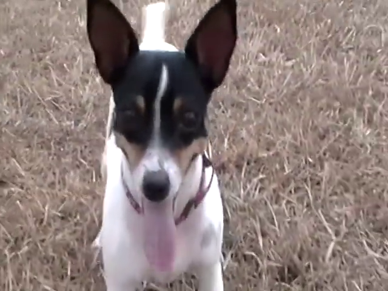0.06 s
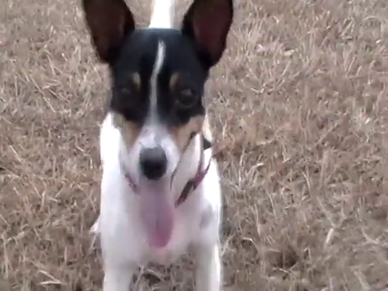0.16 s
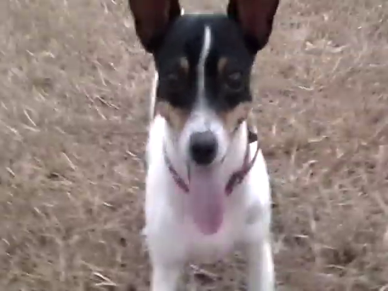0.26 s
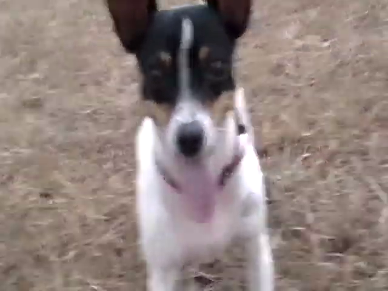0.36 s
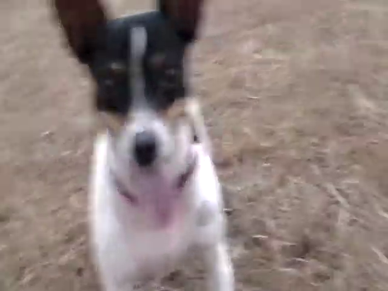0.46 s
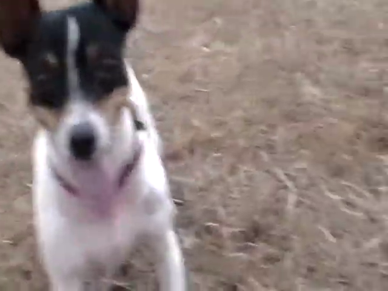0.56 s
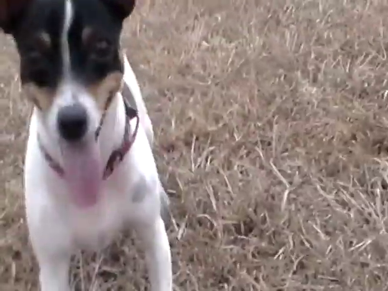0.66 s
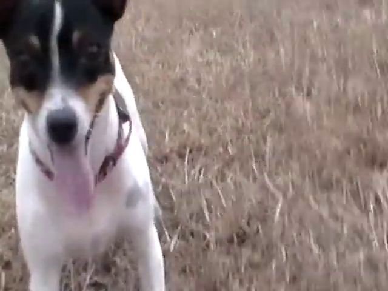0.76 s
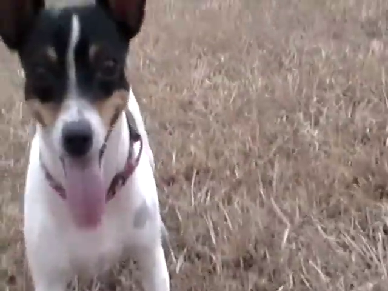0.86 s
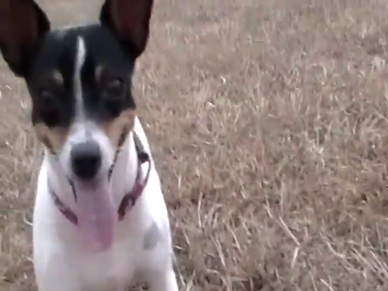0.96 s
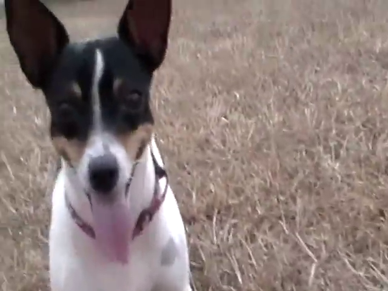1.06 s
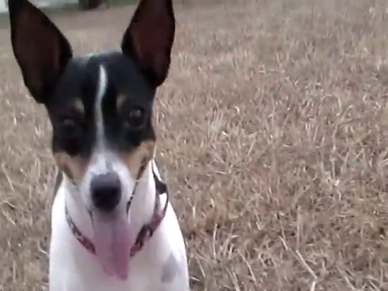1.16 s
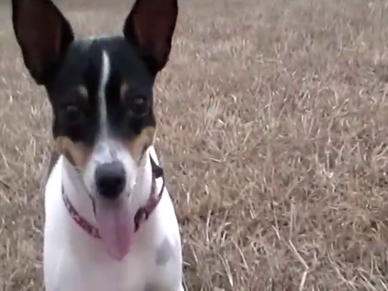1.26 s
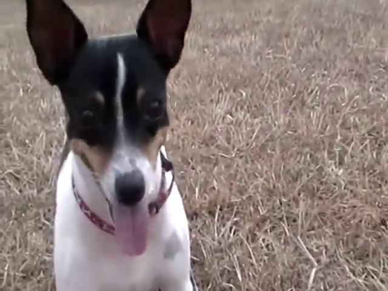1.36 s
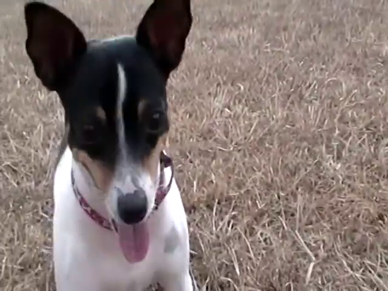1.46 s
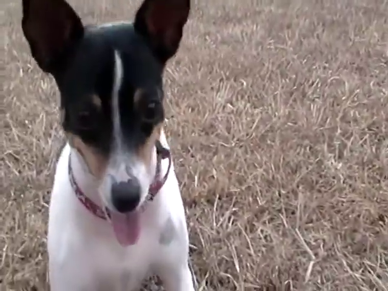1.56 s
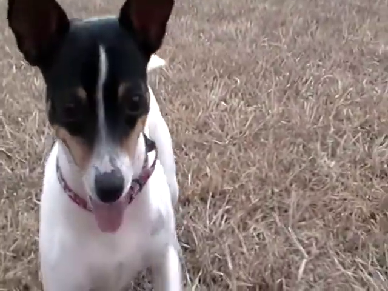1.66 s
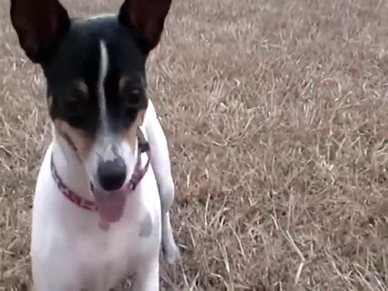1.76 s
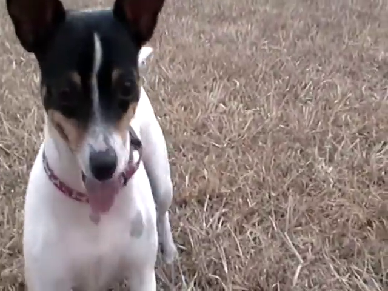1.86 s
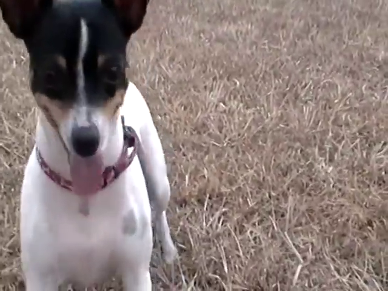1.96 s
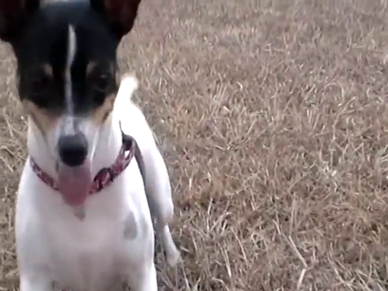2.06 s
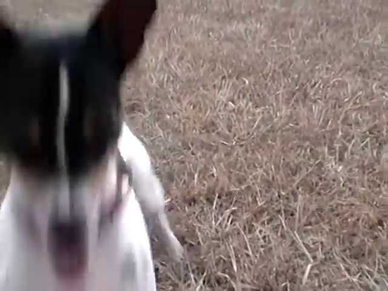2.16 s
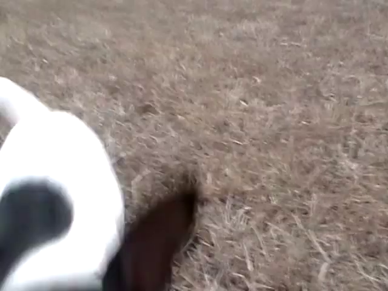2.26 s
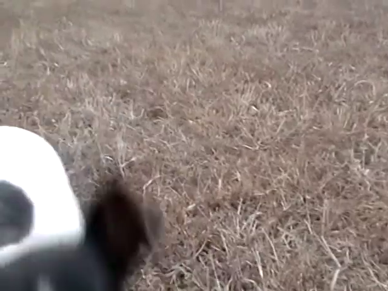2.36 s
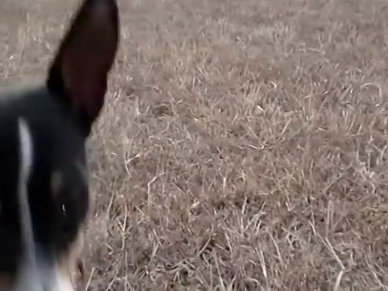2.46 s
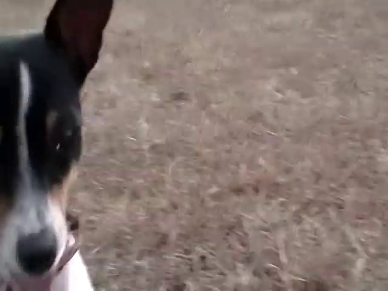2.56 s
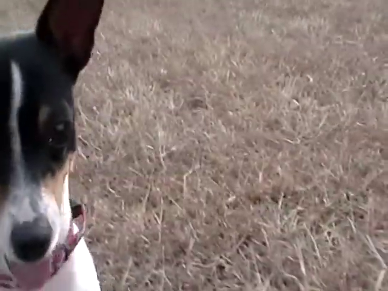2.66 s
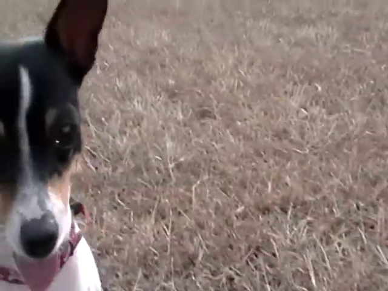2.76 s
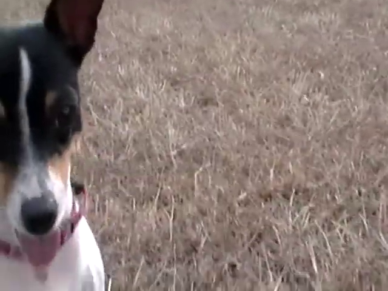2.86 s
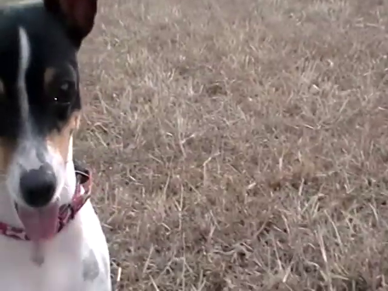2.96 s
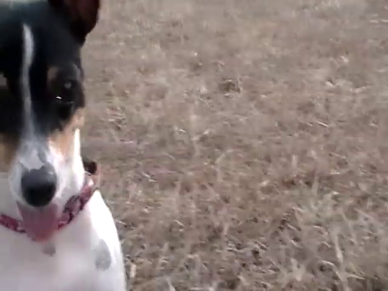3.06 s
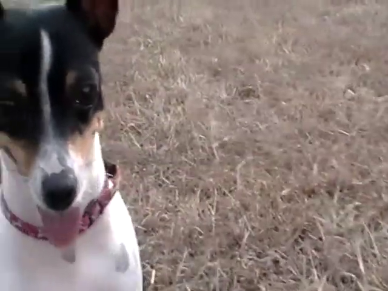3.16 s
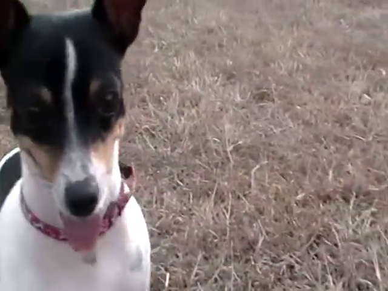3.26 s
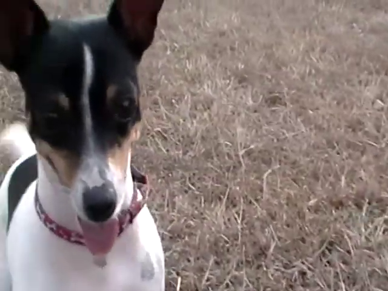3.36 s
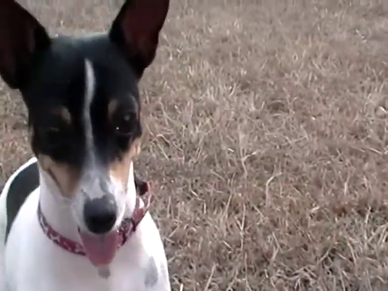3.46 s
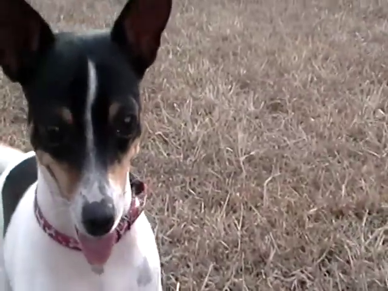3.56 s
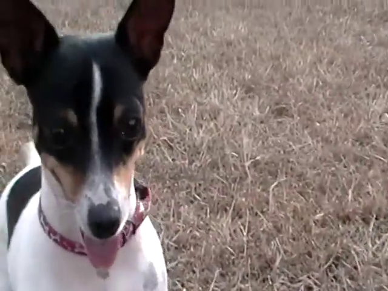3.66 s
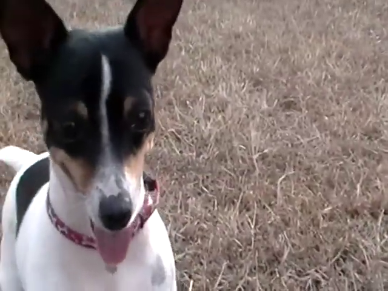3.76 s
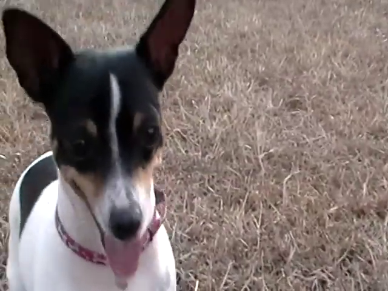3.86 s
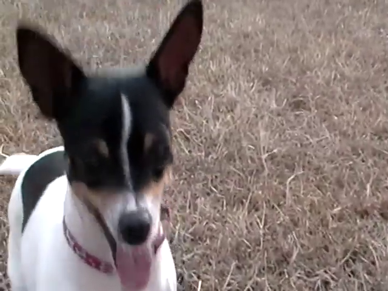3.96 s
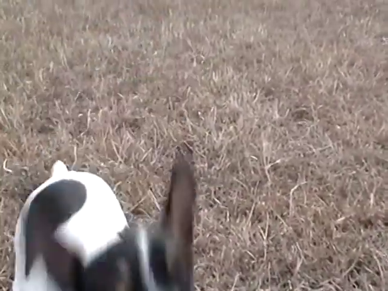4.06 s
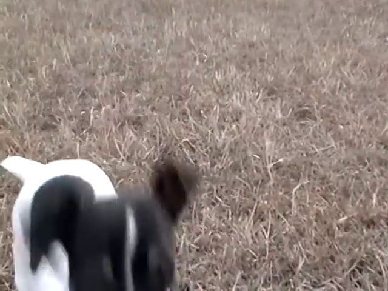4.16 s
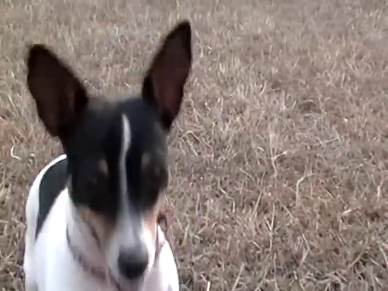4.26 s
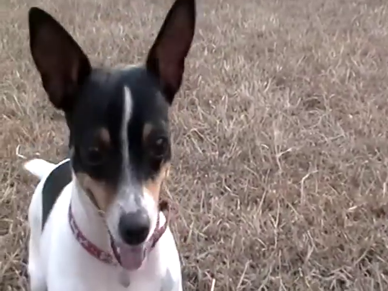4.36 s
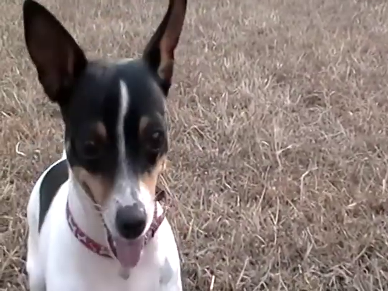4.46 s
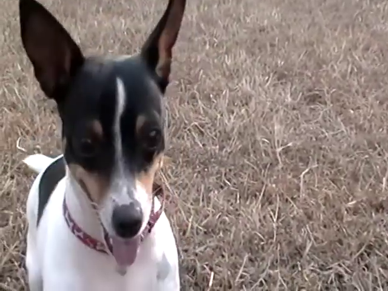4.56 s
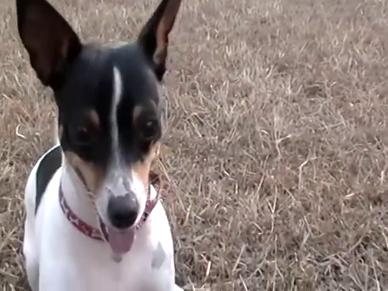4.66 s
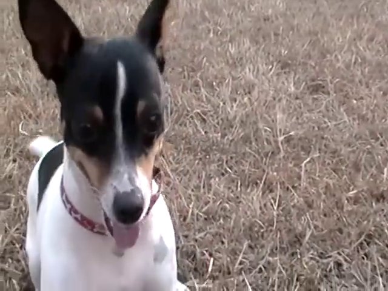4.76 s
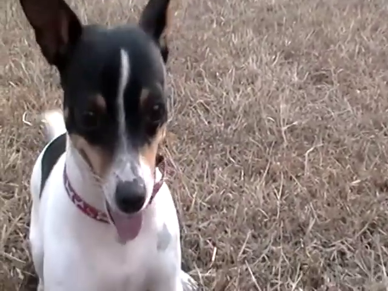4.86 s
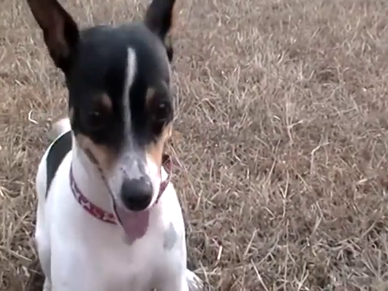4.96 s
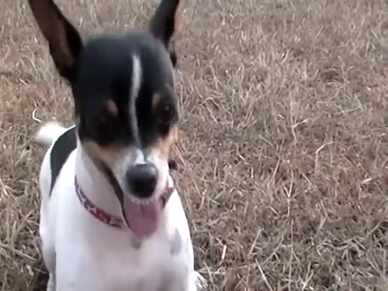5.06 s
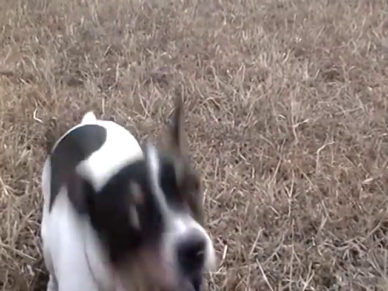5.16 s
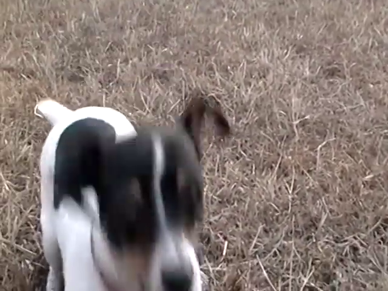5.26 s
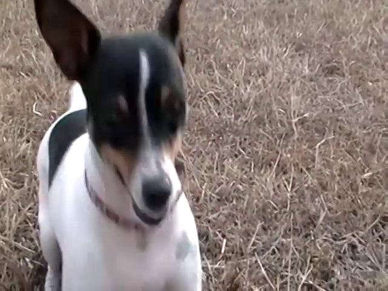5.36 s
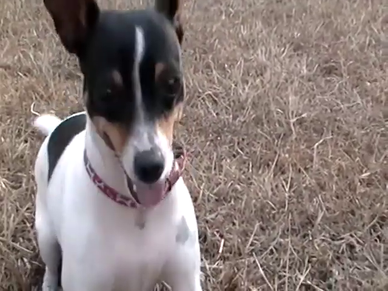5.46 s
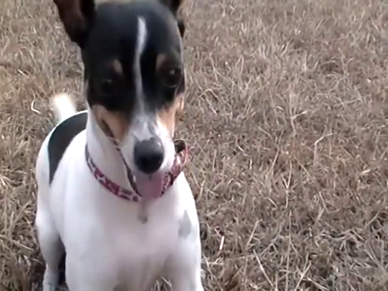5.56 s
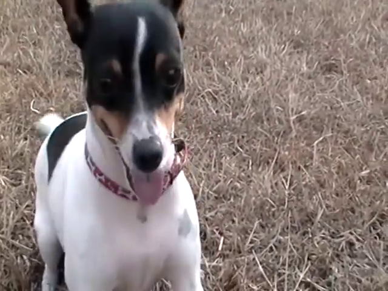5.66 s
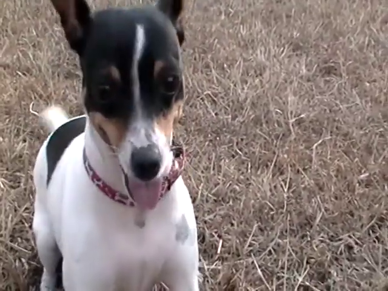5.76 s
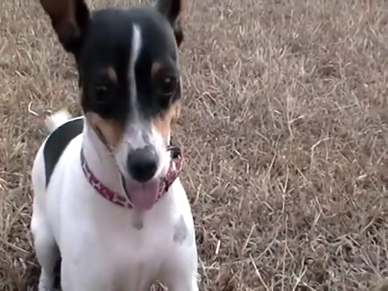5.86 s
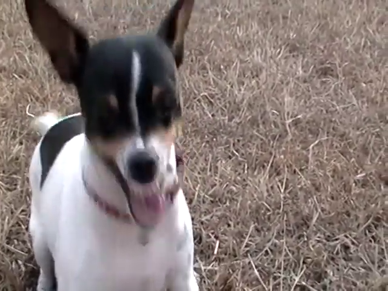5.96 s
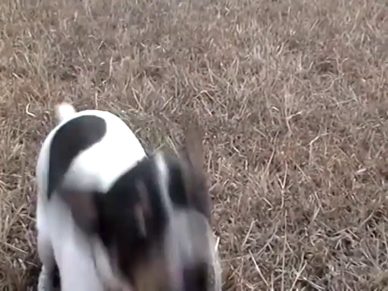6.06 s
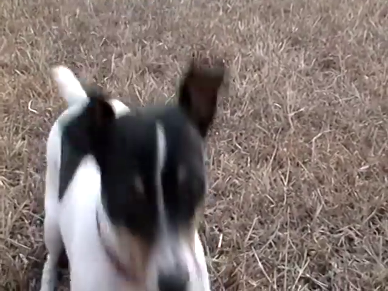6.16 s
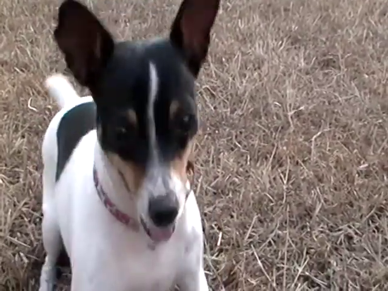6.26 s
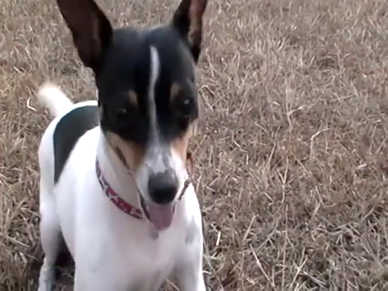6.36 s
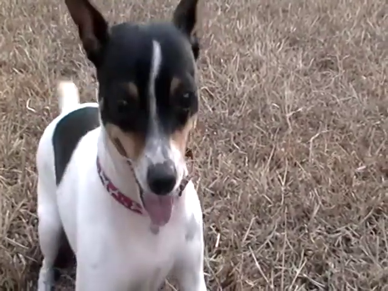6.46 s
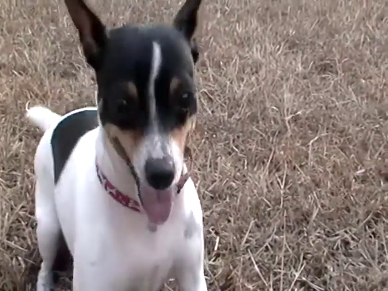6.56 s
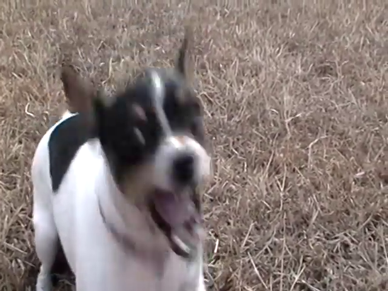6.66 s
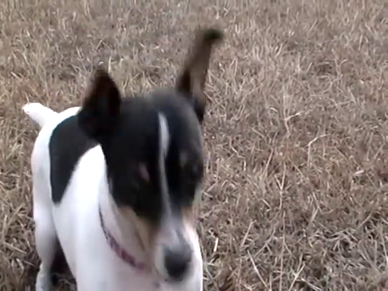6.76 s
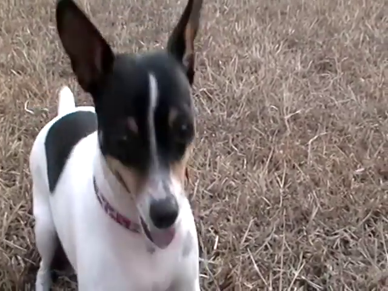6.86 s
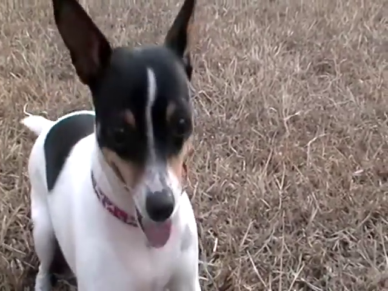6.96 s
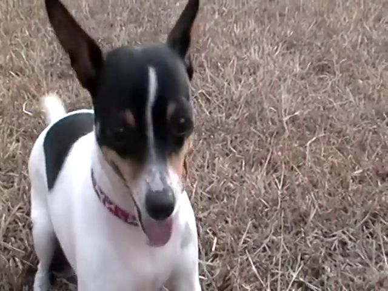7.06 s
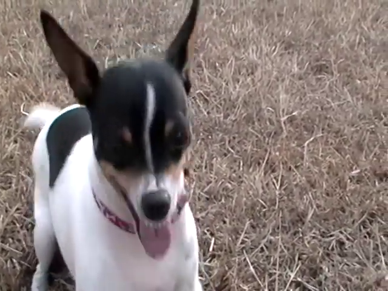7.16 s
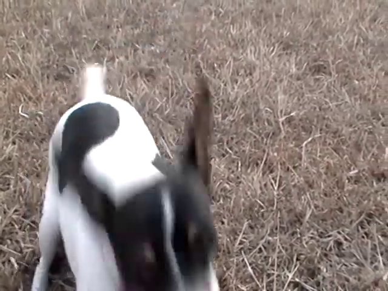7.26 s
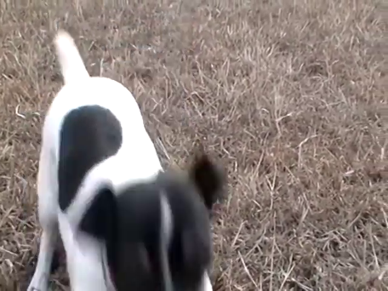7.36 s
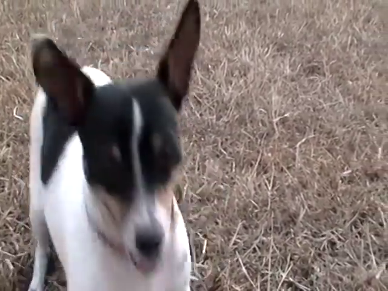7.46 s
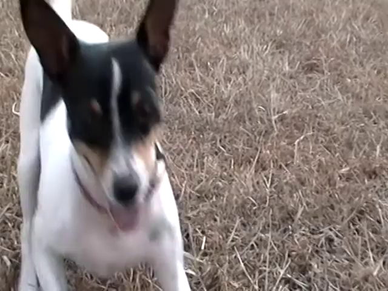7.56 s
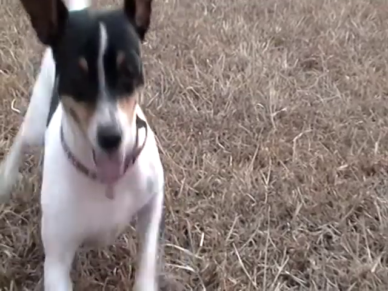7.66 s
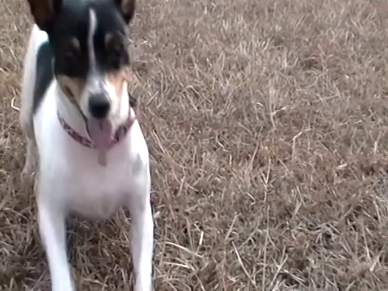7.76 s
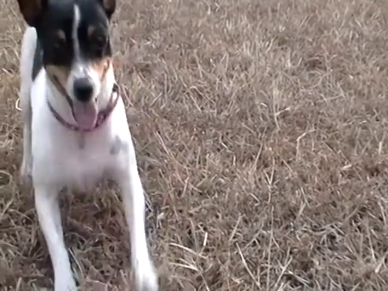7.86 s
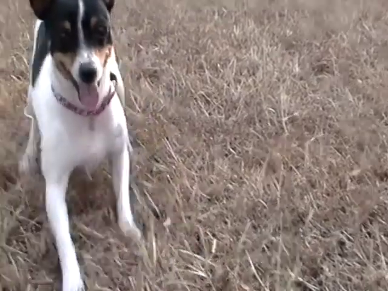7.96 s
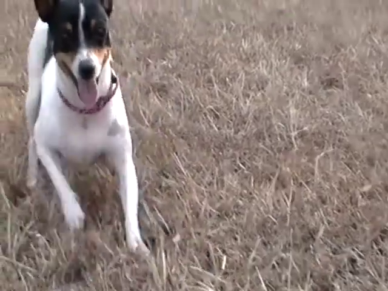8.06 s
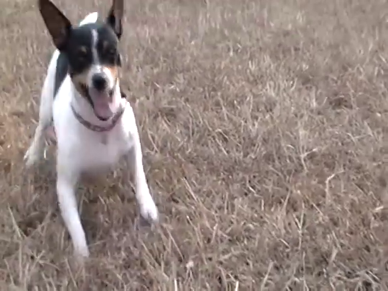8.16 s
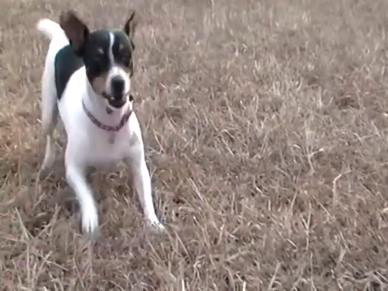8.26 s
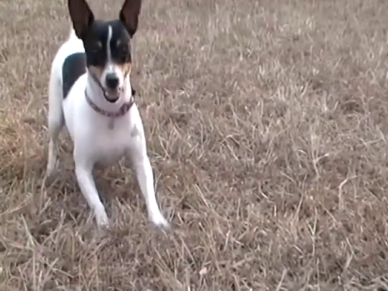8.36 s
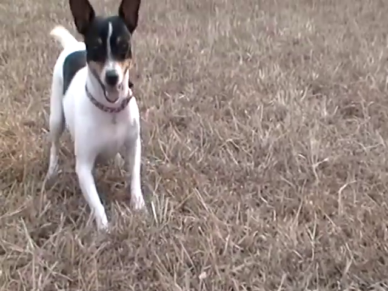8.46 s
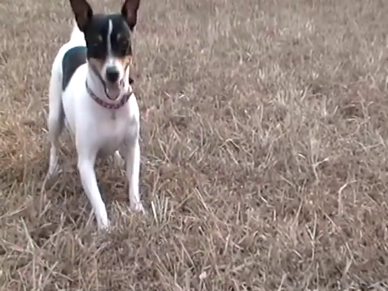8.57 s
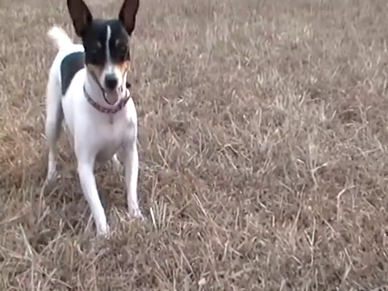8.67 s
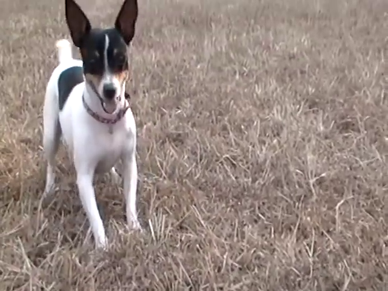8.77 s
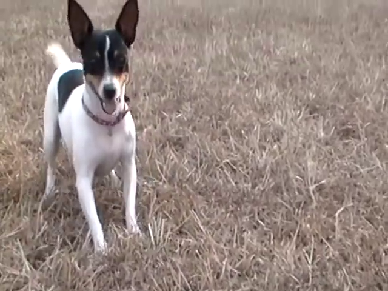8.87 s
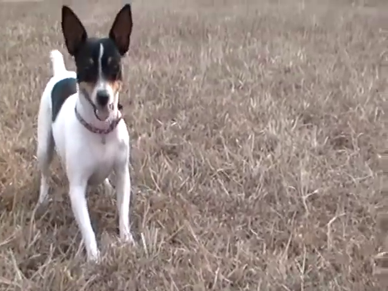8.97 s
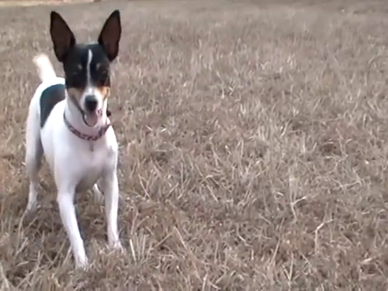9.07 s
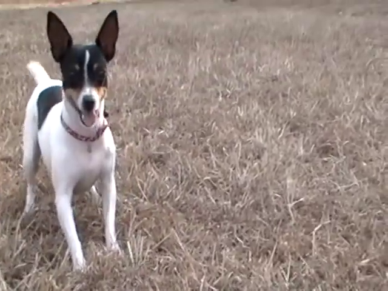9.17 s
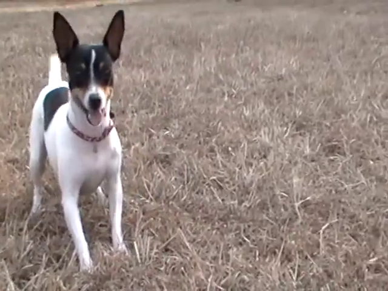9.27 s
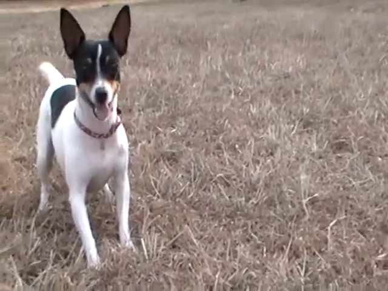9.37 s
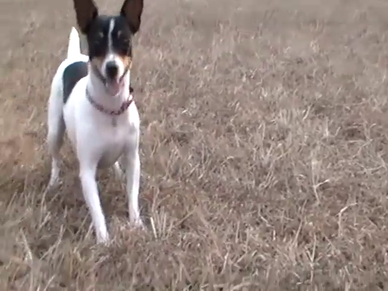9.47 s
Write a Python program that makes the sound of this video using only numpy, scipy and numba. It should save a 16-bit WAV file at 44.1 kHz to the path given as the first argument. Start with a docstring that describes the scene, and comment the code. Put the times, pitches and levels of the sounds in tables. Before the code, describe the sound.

A small dog pants lightly and shifts in crackling dry grass, then barks seven times between about two and eight seconds. Each bark starts with a tiny grunt and bursts into a piercing, rough yelp that clips the close microphone and echoes briefly around the yard. The dog backs off before the last, weaker bark, led by a thin whine and growl. Faint bird whistles and far rumble remain.

```python
"""A small terrier barks seven times, shrill and raspy, on a dry lawn close by, and pants in between.
Each bark is a gliding tone that breaks into chaos and overloads the input; fences and walls throw it back.
A thin whine leads into the last bark, and low grunts and breath thuds go with the barks.
Dry grass rustles as shaped noise, a small bird whistles faintly in gliding tones,
the neighbourhood rumbles far off as coloured noise, and a lens motor whirrs faintly at first."""
import sys
import numpy as np
from scipy import signal
from scipy.fft import rfft, irfft
from scipy.io import wavfile
from scipy.ndimage import map_coordinates
from numba import njit

SR = 44100
rng = np.random.default_rng(int(sys.argv[2]) if len(sys.argv) > 2 else 0)


def transcribe(signal):
    """Save signal, clipped to [-1, 1], as a 16-bit WAV file at the path in sys.argv[1]."""
    frames = np.atleast_2d(signal).T
    limited = np.clip(frames, -1, 1)
    pcm = np.round(limited * 32767).astype(np.int16)
    wavfile.write(sys.argv[1], SR, pcm)


N = 418950  # samples
TIME = np.arange(N) / SR  # s


def undb(db):
    """Logarithmic level: decibels become an amplitude gain."""
    return 10 ** (np.asarray(db) / 20)


def unit(x):
    """Normalisation: scale to rms 1."""
    return x / np.sqrt(np.mean(x ** 2) + 1e-18)


def add(track, s, x):
    """Superposition: mix x into the track from s seconds on."""
    i = max(int(s * SR), 0)
    track[i:i + len(x)] += x[:max(N - i, 0)]


def colour(x, points):
    """Linear filtering: weight the spectrum by (Hz, dB) points, joined on a logarithmic frequency axis."""
    hz, db = np.transpose(points)
    f = np.fft.rfftfreq(x.shape[-1], 1 / SR)
    gain = undb(np.interp(np.log(f + 1), np.log(hz), db))
    return irfft(rfft(x) * gain, x.shape[-1])


def air(size, modes):
    """Turbulence exciting resonances: noise through steep (Hz, width Hz, dB) peaks, rms 1."""
    f = np.fft.rfftfreq(size, 1 / SR) + 1
    gain = sum(undb(db) / (1 + ((f * f - hz * hz) / (f * width)) ** 2) for hz, width, db in modes)
    return unit(irfft(rfft(rng.standard_normal(size)) * gain, size))


def walk(size, rate_hz):
    """Slow random modulation: a smooth curve through random knots of spread 1."""
    knots = rng.standard_normal(int(size * rate_hz / SR) + 4)
    return map_coordinates(knots, [np.arange(size) * rate_hz / SR], order=2, mode="nearest")


def swell(size, edge):
    """Amplitude envelope: a flat top whose round edges take up the given share."""
    return signal.windows.tukey(size, min(edge, 1))


def glides(rows, overtone_db, waver):
    """Frequency modulation: short gliding tones whose overtones change by a fixed step in level."""
    out = np.zeros(N)
    for s, length, first_hz, last_hz, db in rows:
        size = int(length * SR)
        hz = np.geomspace(first_hz, last_hz, size) * (1 + waver * walk(size, 85))
        phase = 2 * np.pi * np.cumsum(hz) / SR
        audible = [k for k in range(4) if (k + 1) * last_hz < SR / 2]
        tone = sum(undb(overtone_db * k) * np.sin((k + 1) * phase) for k in audible)
        add(out, s, undb(db) * unit(tone) * swell(size, .8))
    return out


# Spectrum of the distant rumble. Each row: frequency in Hz, relative spectral level in dB.
TOWN_SPECTRUM = [(15, -46), (25, -30), (53, -5), (137, -1.5), (325, -15.5), (353, -11.5), (382, -15.5),
                 (793, -18), (1130, -19.5), (1440, -28), (1990, -30.5), (6010, -38.5), (8080, -45),
                 (8770, -46), (15900, -64)]
# Stereo width of the rumble. Each row: frequency in Hz, side level minus middle level in dB.
TOWN_SIDE = [(40, -11), (110, -12.5), (200, -11), (400, -6), (1300, -2.5), (4400, 2), (8000, -7.5)]


def town():
    """Incoherent sources add to noise: far traffic and light wind, gently swelling, wide and a little left."""
    mid = unit(colour(rng.standard_normal(N), TOWN_SPECTRUM))
    side = colour(unit(colour(rng.standard_normal(N), TOWN_SPECTRUM)), TOWN_SIDE)
    left_db = 0.46
    stereo = np.array([undb(left_db) * mid + side, undb(-left_db) * mid - side])
    level_db = -49.5 + 1.0 * walk(N, 2.7) + 0.46 * walk(N, 11)
    return stereo * undb(level_db)


# Whirr of the lens motor. Each row: resonance in Hz, width in Hz, relative level in dB.
LENS_MODES = [(1880, 1300, 9.5), (3670, 900, 4.5), (5230, 360, 8), (7400, 380, -6), (9100, 640, -13)]


def lens(stop_s, db):
    """Resonant radiation: the motor's whirr is noise through resonances; it runs at first, then stops."""
    running = np.clip((stop_s - TIME) / 0.014, 0, 1)
    return undb(db) * air(N, LENS_MODES) * running


# The bird's thin whistles. Each row: start in seconds, length in seconds, first pitch in Hz,
# last pitch in Hz, level in dB.
BIRD_WHISTLES = [(.55, 0.11, 7150, 7700, -64), (3.05, 0.057, 7100, 7400, -55), (3.34, .09, 7270, 7400, -69),
                 (3.68, 0.11, 8260, 8160, -71), (8.72, 0.052, 7360, 7470, -64),
                 (8.84, 0.23, 8200, 8200, -72), (9.0, 0.13, 6520, 6400, -68.5),
                 (9.045, 0.027, 5400, 4150, -63), (9.46, 0.088, 7120, 7940, -59)]


def bird():
    """A nearly sinusoidal source: gliding whistles with very weak overtones."""
    return glides(BIRD_WHISTLES, overtone_db=-34, waver=.01)


# Echoes off fences and walls. Each row: delay in seconds, level in dB before the yard's colouring.
WALL_ECHOES = [(0.0609, -29), (0.0815, -26.5), (0.0853, -33), (.1145, -36.5), (.180, -38)]
# Spectrum of what the yard sends back. Each row: frequency in Hz, gain in dB.
YARD_SPECTRUM = [(300, -22.5), (800, -14.5), (1300, -10.5), (1800, -3.5), (2400, -2), (3200, 0.5),
                 (3900, -2.5), (4800, -2.5), (5800, -5), (12000, -23.5)]


def yard(voice):
    """Reflection and scattering: a few distinct echoes and a long tail from trees and houses, unlike at each ear."""
    t = TIME[:SR * 3 // 2]
    decay_s = 0.99  # time to fall by 60 dB
    scatter = rng.standard_normal((2, len(t))) * undb(5 * walk(len(t), 900) - 60 * t / decay_s)
    scatter *= np.clip((t - .045) / 0.013, 0, 1)
    # row 0 is the middle, row 1 the side
    response = undb(-28.0) * scatter / np.sqrt(np.sum(scatter ** 2) / 2)
    response[1] *= undb(-7.5)
    for delay, db in WALL_ECHOES:
        response[0, int(delay * SR)] += undb(db)
    returned = signal.fftconvolve(voice[None], response, axes=1)[:, :N]
    mid, side = colour(returned, YARD_SPECTRUM)
    return np.array([mid + side, mid - side])


# Spectrum of brushing dry blades. Each row: frequency in Hz, relative spectral level in dB.
GRASS_SPECTRUM = [(400, -22), (1000, -6.5), (2500, -6), (4500, -6.5), (7500, -3), (10000, -6),
                  (13000, -12.5), (16000, -16.5)]
# Faint stir of the grass between swishes. Each row: time in seconds, level in dB.
GRASS_STIR = [(0, -62), (.6, -61.5), (.85, -58.5), (1.12, -55.5), (1.2, -73), (1.5, -69), (1.7, -65.5),
              (3.2, -51), (3.75, -62), (4.55, -56.5), (4.85, -60.5), (6.5, -53.5), (6.95, -61.5),
              (8.5, -57), (8.8, -64.5), (9.5, -77)]
# Swishes as the dog shifts about. Each row: middle in seconds, length in seconds, peak level in dB.
GRASS_SWISHES = [(.06, 0.085, -51), (.24, 0.16, -51.5), (.39, 0.18, -43), (.785, 0.076, -49),
                 (1.665, 0.14, -49.5), (1.79, 0.12, -46.5), (1.97, 0.094, -47), (2.11, 0.21, -53),
                 (2.245, 0.17, -33), (2.45, 0.24, -40), (2.67, 0.23, -39), (2.78, 0.14, -41.5),
                 (2.96, 0.21, -41.5), (3.27, 0.27, -44.5), (3.86, 0.13, -44), (4.0, 0.29, -40.5),
                 (4.32, 0.32, -46), (4.97, 0.13, -55.5), (5.115, 0.17, -41.5), (5.396, 0.22, -45.5),
                 (5.5, 0.17, -51), (6.04, 0.4, -40), (6.35, 0.32, -48.5), (6.6, 0.16, -48),
                 (6.755, 0.14, -33), (7.06, 0.048, -52), (7.2, 0.28, -47), (7.615, 1, -39.5),
                 (7.9, 0.34, -40.5), (8.1, 0.74, -42.5), (8.254, 0.2, -30), (8.437, 0.2, -44.5),
                 (8.61, 0.13, -52)]
# Footfalls, swishes and snapping stalks. Each row: start in seconds, level in dB, centre in Hz,
# rise in seconds, decay constant in seconds.
FOOTFALLS = [(0.367, -26.5, 8500, 0.024, 0.018), (0.43, -39, 700, .002, 0.011),
             (0.647, -37.5, 886, 0.0013, 0.011), (0.756, -42, 880, 0.0018, 0.013),
             (.756, -51, 5950, .003, 0.059), (1.123, -44.5, 4500, 0.0059, 0.0092),
             (2.996, -30, 8100, 0.0011, 0.003), (8.89, -46, 994, 0.00096, 0.003)]


def grass():
    """Frictional noise: dry blades brush and crackle over a faint stir; a foot lands or a stalk snaps."""
    power = undb(np.interp(TIME, *np.transpose(GRASS_STIR)) + 2 * walk(N, 12)) ** 2
    for s, length, db in GRASS_SWISHES:
        swish = undb(db) * swell(int(length * SR), 0.92)
        add(power, s - length / 2, swish ** 2)
    crackle_db = 2 * walk(N, 900) + 1.4 * walk(N, 56)
    blades = rng.standard_normal(N) * undb(crackle_db)
    out = unit(colour(blades, GRASS_SPECTRUM)) * np.sqrt(power)
    t = TIME[:SR // 5]
    for s, db, hz, rise, decay in FOOTFALLS:
        envelope = np.minimum(t / rise, 1) ** 2 * np.exp(-np.maximum(t - rise, 0) / decay)
        add(out, s, undb(db) * air(len(t), [(hz, 0.95 * hz, 0)]) * envelope)
    return out


# The dog's pants. Each row: middle in seconds, length in seconds, level in dB,
# gain in dB of the resonances above 2000 Hz.
PANT_PUFFS = [(0.124, 0.052, -46.5, -9), (0.861, 0.088, -42.5, -6), (1.968, 0.091, -39.5, -2.5),
              (2.645, 0.095, -26.5, 0), (2.929, 0.11, -28.5, -3), (3.23, 0.087, -30, -2),
              (3.545, 0.13, -38, -2.5), (3.855, 0.12, -30.5, -4.5), (4.371, 0.094, -26, 1),
              (4.647, 0.11, -44, -3), (4.971, 0.1, -33.5, -2.5), (5.51, 0.11, -26.5, 1),
              (5.781, 0.062, -36, -1.5), (5.841, 0.11, -35, -1.5), (6.384, .10, -24, 5),
              (7.066, 0.097, -26.5, 5), (7.650, 0.097, -24, 8), (7.909, .11, -29.5, 7.5),
              (8.614, 0.085, -37.5, 10)]
# Resonances of the panting throat. Each row: frequency in Hz, width in Hz, relative level in dB.
THROAT_MODES = [(797, 120, 1), (1098, 170, 1), (1797, 420, -9), (2752, 810, 0), (4630, 900, -16),
                (6340, 2500, -17.5)]


def panting():
    """Turbulent flow: puffs of air over the tongue, each with its own brightness; saliva makes them flutter."""
    out = np.zeros(N)
    for s, length, db, treble_db in PANT_PUFFS:
        size = int(length * SR)
        modes = [(hz, width, mode_db + treble_db * (hz > 2000)) for hz, width, mode_db in THROAT_MODES]
        flutter_db = 1.5 * walk(size, 180)
        add(out, s - length / 2, undb(db + flutter_db) * air(size, modes) * swell(size, 0.79))
    return out


# Breath from a bark that strikes the microphone. Each row: start in seconds, length in seconds, level in dB.
BREATH_BLASTS = [(2.274, 0.11, -11), (4.055, 0.11, -16.5), (5.165, 0.12, -36), (6.043, 0.11, -32.5),
                 (6.693, .04, -21), (7.285, 0.029, -23.5)]


def blasts():
    """Uncorrelated pressure turbulence: each puff buffets the two ports with its own low noise."""
    out = np.zeros((2, N))
    for s, length, db in BREATH_BLASTS:
        size = int(length * SR)
        for port in out:
            add(port, s, undb(db) * air(size, [(128, 100, 0)]) * swell(size, 0.38))
    return out


# Low grunts that start the barks. Each row: start in seconds, length in seconds, first pitch in Hz,
# last pitch in Hz, level in dB.
BARK_GRUNTS = [(2.268, 0.017, 223.5, 356, -14.5), (4.046, 0.013, 219, 363, -15),
               (5.162, 0.018, 246, 398, -15.5), (6.041, 0.023, 271, 418, -14),
               (6.639, 0.013, 234, 400, -16.5), (7.276, 0.017, 252, 400, -14),
               (8.197, 0.036, 200, 371.5, -15.5), (8.226, 0.0224, 390, 392, -10.5)]


def grunts():
    """A harmonic source: short low tones that rise in pitch, with falling overtones."""
    return glides(BARK_GRUNTS, overtone_db=-8.0, waver=.09)


# Resonances of the half-closed throat. Each row: frequency in Hz, width in Hz, relative level in dB.
GROWL_THROAT = [(278.6, 160, 1.5), (1440, 200, -4), (3300, 760, 0)]


def growl(s, length, first_hz, last_hz, db):
    """Impulse excitation: slow slaps of the vocal folds, speeding up, ring the throat just before a bark."""
    size = int(length * SR)
    hz = np.geomspace(first_hz, last_hz, size) * np.exp(0.2 * walk(size, 150))
    cycle = np.floor(np.cumsum(hz) / SR)
    slaps = np.diff(cycle, prepend=-1) * np.geomspace(.4, 1, size)
    t = TIME[:SR // 50]
    ring = np.zeros(len(t))
    for mode_hz, width, mode_db in GROWL_THROAT:
        ring += undb(mode_db) * np.sin(2 * np.pi * mode_hz * t) * np.exp(-np.pi * width * t)
    out = np.zeros(N)
    add(out, s, undb(db) * unit(np.convolve(slaps, ring)))
    return out


# Upper resonances of the open mouth. Each row: frequency in Hz, width in Hz, relative level in dB.
MOUTH_MODES = [(2233, 480, 1.5), (3205, 600, -8), (4400, 780, -16), (7040, 5000, -23)]
# The small mouth radiates little below its first resonance. Each row: frequency in Hz, gain in dB.
MOUTH_RADIATION = [(500, -8), (850, -4.5), (1150, 0), (1700, 0), (2350, 0), (3200, -1), (4200, -0.5)]
# What all barks share: the pitch dips as the jaw drops, then crests and falls away as it closes.
DIP_S, CLEARING_S, RELEASE_S = .047, .008, 0.018
FALL_CURVE = 2.8  # the higher, the longer the pitch hangs at its crest
ONSET_DB, FADE_DB, CUTOFF_DB = -20.5, -4.5, -25  # level at the start, before the release and at the end
EFFORT_WAVER_DB, ROUGH_WAVER = 2.5, .14  # random spread of the level, and of the roughness as a share
# Roughness as a share of the bark's own: the rasp steadies, then is wildest just before it clears.
STEADY_AT_S, STEADY_SHARE, WILDEST_SHARE = .023, .66, 1.2
CLOSING_ROUGH = 0.93  # share of the ring's roughness left at the end
JAW_OPENING_DB, JAW_CLOSING_DB = -14, -14.5  # brightness lost at the start and at the end
PITCH_FLUTTER, PITCH_JITTER = .04, .055  # slower and faster relative wobble of the pitch at full roughness


def bark(length, attack, rasp_db, ring_db, open_hz, dip_hz, crest_hz, close_hz, crest, clears, rasp, ring, open_db):
    """Nonlinear vocal-fold vibration: chaos clears into a shrill tone, and the open jaw frees upper resonances."""
    size = int(length * SR)
    t = TIME[:size]
    falling = np.clip((t - crest) / max(length - crest, .005), 0, 1) ** FALL_CURVE
    hz = np.interp(t, [0, min(DIP_S, crest), crest], [open_hz, dip_hz, crest_hz])
    hz = hz + (close_hz - crest_hz) * falling

    # 0 while rasping, 1 once ringing
    cleared = np.clip((t - clears) / CLEARING_S + .5, 0, 1)
    db = rasp_db + (ring_db - rasp_db) * cleared + EFFORT_WAVER_DB * walk(size, 90)
    envelope_s = np.sort([0, attack, crest, length - RELEASE_S, length])
    db = db + np.interp(t, envelope_s, [ONSET_DB, 0, 0, FADE_DB, CUTOFF_DB])

    rasping = rasp * np.interp(t, [0, STEADY_AT_S, clears - CLEARING_S], [1, STEADY_SHARE, WILDEST_SHARE])
    ringing = ring * np.interp(t, [clears, length], [1, CLOSING_ROUGH])
    rough = rasping + (ringing - rasping) * cleared
    rough = np.clip(rough * (1 + ROUGH_WAVER * walk(size, 100)), 0, 1)

    # the jaw is widest as the rasp clears
    closing = np.clip((t - clears) / max(length - RELEASE_S - clears, .005), 0, 1) ** 2
    opening = np.clip(1 - t / clears, 0, 1)
    jaw = undb(open_db + JAW_OPENING_DB * opening + JAW_CLOSING_DB * closing)

    wobble = PITCH_JITTER * walk(size, 500) + PITCH_FLUTTER * walk(size, 170)
    phase = 2 * np.pi * np.cumsum(hz * (1 + rough * wobble)) / SR
    clean = 1 - rough ** 2
    # chaotic cycles spread the fundamental into a band
    chaos = walk(size, 660) * np.sin(phase) + walk(size, 660) * np.cos(phase)
    low = clean * np.sqrt(2) * np.sin(phase) + np.sqrt(1 - clean ** 2) * chaos
    # on the way to chaos every second cycle differs, which adds a line at one and a half times the pitch
    half_line = rough * undb(-4.0) * np.sin(3 * phase / 2)
    harmonics = np.sin(2 * phase) + undb(-11) * np.sin(3 * phase) + undb(-34.5) * np.sin(4 * phase)
    overtones = unit(harmonics + half_line)
    # the overtones break up sooner than the fundamental
    tonal = clean ** (5 / 4)
    high = tonal * overtones + np.sqrt(1 - tonal ** 2) * air(size, MOUTH_MODES)
    # loose throat tissue chops the rough stretches into a rattle
    rattle_hz = 220 * (1 + .35 * walk(size, 200))
    rattle_db = 4 * rough * np.sin(2 * np.pi * np.cumsum(rattle_hz) / SR)
    radiated = colour(low + jaw * high, MOUTH_RADIATION) / np.sqrt(1 + jaw ** 2)
    return undb(db + rattle_db) * radiated * swell(size, 0.022)


def two_ports(x):
    """Near-field pickup: a close sound reaches both microphones alike, but for a weak bounce off the ground."""
    late = np.interp(TIME - .0031, TIME, x)
    bounce = colour(late, [(300, -20), (1500, -26.5), (8000, -24.5)])
    return np.array([x + bounce, x - bounce])


# The barks, and the thin whine that leads into the last. Each row: start in seconds, length in seconds,
# attack in seconds, level of the rasp in dB, level of the ring in dB, opening pitch in Hz, dip in Hz,
# crest in Hz, closing pitch in Hz, time of the crest in seconds, time the rasp clears in seconds,
# basic roughness of the rasp and of the ring (1 is full chaos), brightness of the open jaw in dB.
BARK_SHAPES = [ (2.273, 0.12, .005, 6.5, 13, 1241, 1075, 1610, 897, .066, 0.069, 0.75, 0.37, 8),
               (4.047, 0.13, 0.009, 4.5, 3, 1390, 1151, 1536, 1057, .083, .079, 0.69, 0.5, 4),
               (5.162, 0.12, 0.012, 5.5, 4, 1480, 1129, 1484, 1080, 0.075, 0.083, 0.7, 0.52, 2.5),
               (6.043, 0.1, 0.0031, 3.5, 4.5, 1430, 1236, 1376, 1100, 0.08, .068, .65, 0.51, 3.5),
               (6.638, 0.1, 0.018, 1.5, 10.5, 1312, 1231, 1370, 1030, 0.067, 0.0524, 0.87, 0.42, -1),
               (7.277, 0.091, .014, 9.5, 12, 1481, 1184, 1374, 1000, .065, 0.041, 0.67, 0.17, -2),
               (8.146, 0.11, 0.0036, -29.5, -29, 1490, 1430, 1447, 1440, 0.05, .060, 0.3, 0.47, -16.5),
               (8.207, 0.075, 0.022, 1, -1.5, 1557, 1621, 1555, 1400, 0.0441, 0.046, 1.2, 0.8, -4.5), ]
# The dog backs away near the end. Each row: time in seconds, gain of the direct voice in dB.
RETREAT_GAIN = [(7.6, -0.5), (8.1, -7.5)]


def scene():
    """Direct and reflected sound: the dog stands close; the yard answers just as loudly when it steps back."""
    voice = grunts() + growl(8.164, length=0.047, first_hz=137, last_hz=190.9, db=-21)
    for s, *shape in BARK_SHAPES:
        add(voice, s, bark(*shape))
    direct = voice * undb(np.interp(TIME, *np.transpose(RETREAT_GAIN)))
    dog = two_ports(direct + panting() + grass()) + blasts() + yard(voice)
    return dog + town() + bird() + lens(stop_s=1.15, db=-59.5)


@njit
def follow(x, attack, release):
    """Envelope detection: a one-pole smoother with separate rise and fall speeds."""
    out, e = np.empty(len(x)), 0.
    for i in range(len(x)):
        e += (x[i] - e) * (attack if x[i] > e else release)
        out[i] = e
    return out


def ride(x, threshold_db, slope, attack_s, release_s, lag_s):
    """Dynamic compression: turn both channels down by slope dB for each dB over the threshold, after a lag."""
    level = follow(np.abs(x).mean(axis=0), 1 / (attack_s * SR), 1 / (release_s * SR))
    gain = np.maximum(level / undb(threshold_db), 1) ** -slope
    return x * np.interp(TIME - lag_s, TIME, gain)


def record(dry):
    """Saturation: the input ducks yet overloads, unlike in each channel; a late second gain stage follows."""
    ceiling = np.array([[.60], [.71]])
    bias = np.array([[.11], [.07]])  # lopsided clipping turns the rasp into a low thud
    x = ride(dry, threshold_db=-20.0, slope=0.13, attack_s=0.014, release_s=0.054, lag_s=.002)
    x = x / ceiling + bias
    knee = 3.2  # the higher, the harder the clipping
    x = ceiling * (x / (1 + np.abs(x) ** knee) ** (1 / knee) - bias)
    x = signal.sosfilt(signal.butter(2, 60, "high", fs=SR, output="sos"), x)
    # a broad treble lift makes each flat top overshoot
    treble = signal.sosfilt(signal.butter(1, [4500, 10000], "band", fs=SR, output="sos"), x)
    x = x + 0.29 * treble
    x = ride(x, threshold_db=-11.5, slope=0.46, attack_s=0.014, release_s=0.25, lag_s=0.015)
    top_hz = 15900
    return signal.sosfilt(signal.ellip(10, .2, 70, top_hz, fs=SR, output="sos"), x)


dry = scene()
out = record(dry)
transcribe(out)
```